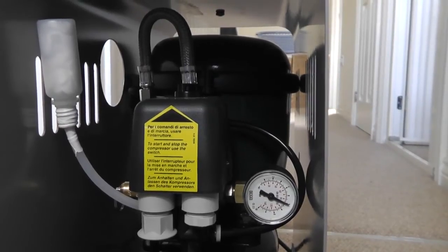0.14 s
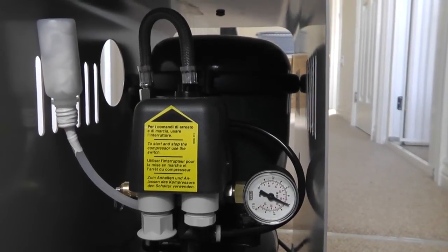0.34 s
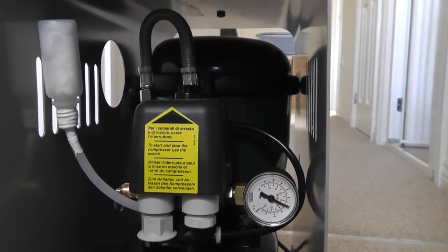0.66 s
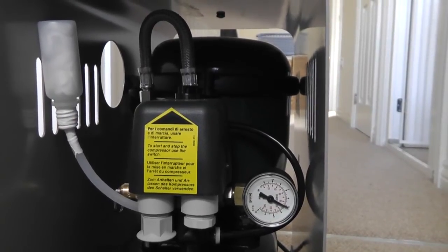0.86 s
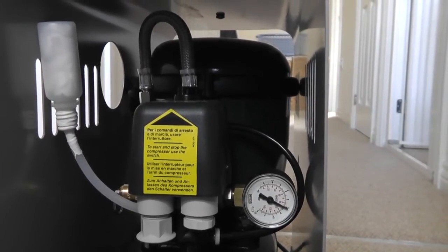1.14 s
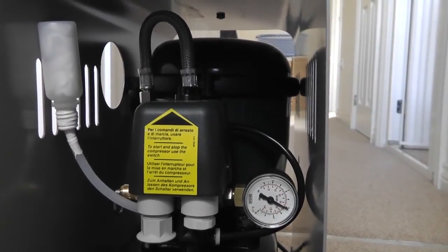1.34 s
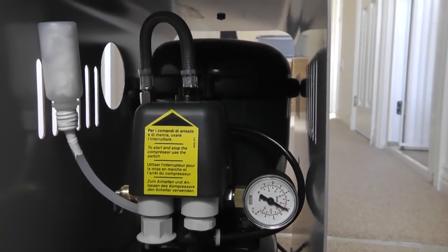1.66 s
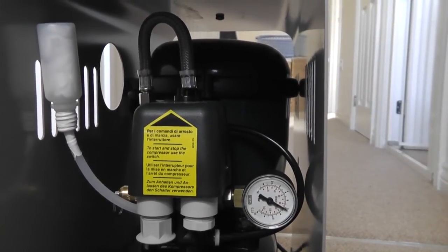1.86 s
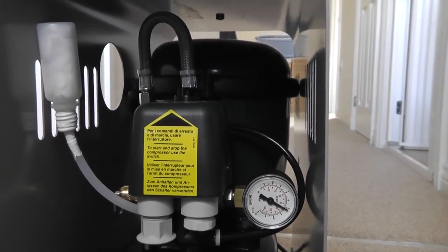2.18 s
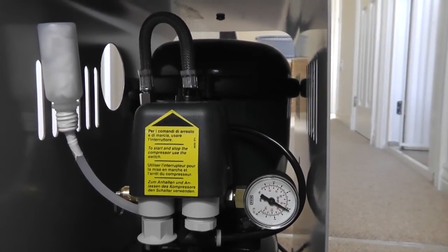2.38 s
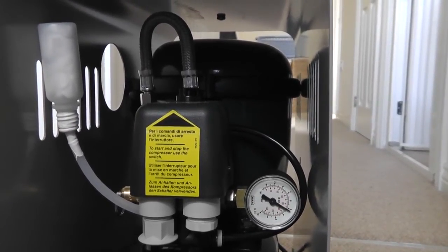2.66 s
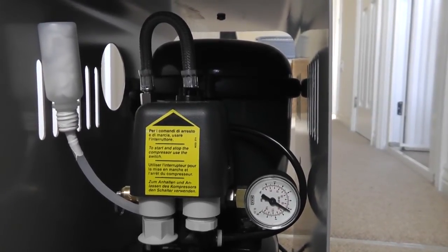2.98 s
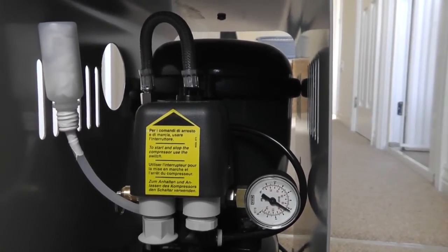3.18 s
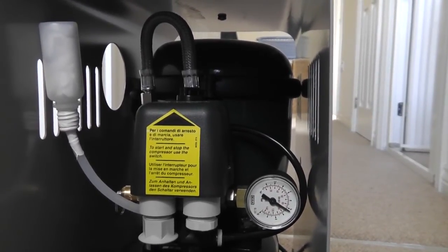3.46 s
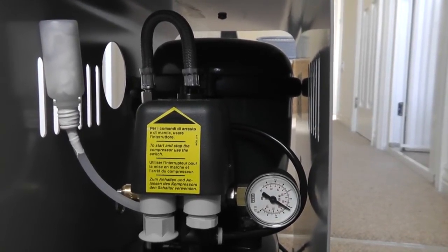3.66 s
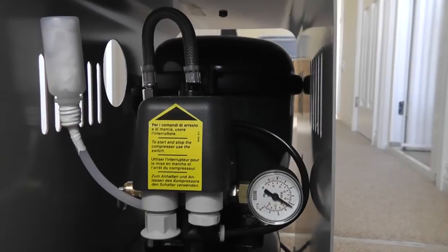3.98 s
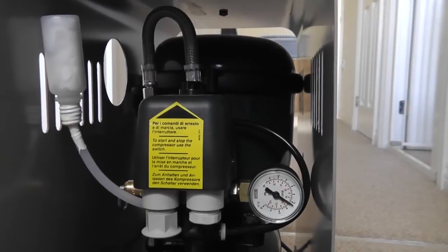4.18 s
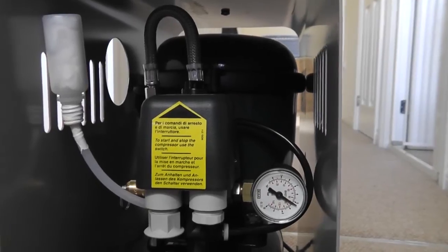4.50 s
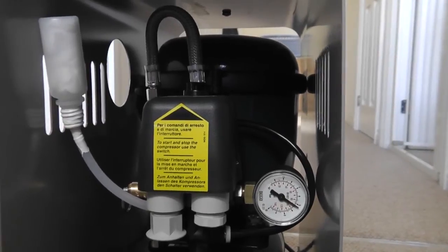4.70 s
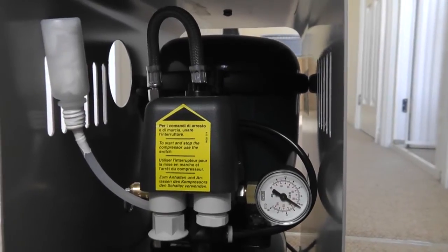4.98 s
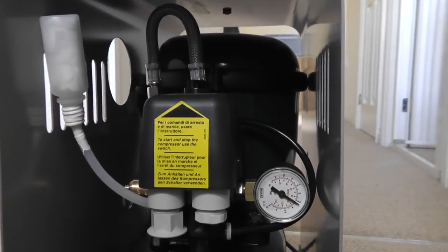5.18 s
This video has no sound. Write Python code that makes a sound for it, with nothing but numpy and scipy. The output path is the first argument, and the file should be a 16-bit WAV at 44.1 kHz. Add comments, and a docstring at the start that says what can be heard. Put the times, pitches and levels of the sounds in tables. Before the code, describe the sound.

A small compressor hums and buzzes steadily, then its switch snaps off loudly, a short burst of air vents, and soft glugs follow.

```python
"""A small sealed piston compressor hums in its cabinet over quiet room tone: repeating shaft tones, gas noise
and motor hum. Its shaft slips against the mains, so the bass beats slowly; later a faint low drone climbs.
Then the pressure switch snaps off (noise bursts and ringing metal), the motor stops and the unloader dumps
the pipe's air through a silencer as fading, coloured noise. A few soft gliding glugs follow as the pump
settles. A small workroom answers everything from the snap onward."""
import sys
import numpy as np
from scipy import signal
from scipy.fft import rfft, irfft, next_fast_len
from scipy.io import wavfile
from scipy.ndimage import map_coordinates

SR = 44100
rng = np.random.default_rng(int(sys.argv[2]) if len(sys.argv) > 2 else 0)


def store_pcm(level_fs):
    """Save levels as 16-bit WAV."""
    pcm = np.round(np.clip(level_fs, -1, 1) * 32767).astype(np.int16)
    wavfile.write(sys.argv[1], SR, np.atleast_2d(pcm).T)


N = 235398
T = np.arange(N) / SR  # time of each sample, s
SHAFT_HZ, MAINS_HZ = 49.136, 49.94
CUT_OUT_S = 4.5645  # when the switch snaps off
TOP_HZ = 15800  # nothing is kept above this


def amp(db):
    """Turn decibels into a gain."""
    return 10 ** (np.asarray(db) / 20)


def unit(x):
    """Scale to an average (rms) level of 1."""
    return x / np.sqrt(np.mean(x ** 2) + 1e-20)


def since(start):
    """Seconds gone by since start, zero before it."""
    return np.maximum(T - start, 0)


def ramp(start, length):
    """A straight rise from 0 to 1."""
    return np.clip((T - start) / length, 0, 1)


def wobble(rate):
    """A smooth random curve with rate new random points a second."""
    points = rng.standard_normal(int(N * rate / SR) + 4)
    return map_coordinates(points, [T * rate], mode="nearest")


def along(points, hz):
    """Read each value column of a (f/Hz, ..) table at hz, on a log axis."""
    f, *columns = np.transpose(points)
    return [np.interp(np.log(hz + 1), np.log(f + 1), c) for c in columns]


def filtered(x, response):
    """Change each frequency of x by the gain that response gives for it."""
    size = next_fast_len(N + SR // 2)
    spectrum = rfft(x, size) * response(np.fft.rfftfreq(size, 1 / SR))
    return irfft(spectrum, size)[..., :N]


def colour(points):
    """A smooth tone colour drawn through (f/Hz, level/dB) points."""
    return lambda f: amp(along(points, f)[0])


def resonances(modes):
    """A body that favours its own notes, given as (f/Hz, width/Hz, level/dB)."""
    def response(f):
        total = 0
        for k, (centre, width, db) in enumerate(modes):
            peak = 1j * f * width / (centre * centre - f * f + 1j * f * width)
            total = total + (-1) ** k * amp(db) * peak  # neighbours have opposite signs
        return total
    return response


# how alike left and right are: (f/Hz, likeness from 0 to 1)
ALIKE = [(60, 0.15), (300, 0.37), (1400, 0.6), (2700, 0.93), (3800, 0.91), (6800, 1), (9500, 0.69),
         (15000, 0.27)]


def noise():
    """White stereo noise: a shared middle plus a side part of opposite sign in each ear."""
    def middle_and_side(f):
        turn = np.arccos(np.clip(along(ALIKE, f)[0], -1, 1)) / 2
        return np.array([np.cos(turn), np.sin(turn)])
    mid, side = filtered(rng.standard_normal((2, N)), middle_and_side)
    return np.array([mid + side, mid - side])


def out_of_step(hz):
    """Cabinet reflections give a tone opposite phase offsets at left and right."""
    spread = np.sqrt(np.abs(1 - along(ALIKE, hz)[0]))
    return np.array([[1], [-1]]) * spread * rng.standard_normal(np.shape(hz))


# colour of the quiet room: (f/Hz, relative level/dB)
ROOM_TONE = [(20, -19), (45, -10), (80, 4.5), (150, -1), (300, -6.5), (800, -11), (2000, -26), (5000, -23),
             (15500, -21.5)]


def room_tone(db):
    """Steady coloured noise under everything."""
    return amp(db) * unit(filtered(noise(), colour(ROOM_TONE)))


# strong low tones of the shaft: (multiple of the shaft speed, left level/dB, right level/dB)
LOW_ORDERS = [(1, -65.0, -69.0), (2, -59.0, -59.0), (3, -83.0, -78.0), (4, -80.0, -77.0), (5, -77.0, -70.0),
              (6, -57.0, -56.0), (7, -52.0, -53.0), (8, -48.0, -52.0), (9, -64.0, -73.0),
              (10, -56.0, -54.0), (11, -61.0, -64.0), (12, -59.0, -56.0), (13, -49.0, -46.0),
              (14, -53.0, -49.0), (15, -54.0, -52.0), (16, -54.0, -61.0)]
# the buzz above them, before the ridges shape it: (f/Hz, level/dB of each multiple)
BUZZ = [(830, -69), (980, -72.5), (1040, -59.5), (1400, -66), (1800, -73), (2450, -78.5), (2850, -67),
        (3350, -66), (3500, -79.5), (4700, -91), (5700, -91.5), (6300, -80.5), (8800, -85.5), (9500, -92),
        (15000, -104)]
# narrow shell resonances that raise or lower the buzz tones under them: (f/Hz, width/Hz, change/dB)
RIDGES = [(1458, 29, 6), (1696, 26, 12), (1981, 26, 15), (2550, 16, 9.5), (2852, 68, 7), (3770, 36, 11.5),
          (5294, 61, 14.5), (6320, 87, 8), (7150, 120, 3.5), (8030, 200, -8), (8260, 48, 7),
          (11050, 60, 12.5)]
# when in the turn each pitch leaves the shell: (f/Hz, arrival/turns, scatter/turns)
ARRIVAL = [(100, 0.407, 0.096), (262, 0.36, 0.044), (393, 0.55, 0.016), (447, 0.38, 0.071),
           (547, 0.908, 0.042), (600, 0.774, 0.041), (710, 0.72, 0), (771, 0.493, 0.09), (980, 0.844, 0.23),
           (1591, .65, 0.28), (3013, .46, 0.163), (7020, .58, 0.29)]


def piston(turns, uneven_db, apart):
    """The shell repeats one pattern each turn, built from multiples of the shaft speed."""
    order = np.arange(1, int(TOP_HZ / SHAFT_HZ))
    hz = order * SHAFT_HZ
    lift = sum(db * np.exp(-((hz - centre) / width) ** 2) for centre, width, db in RIDGES)
    buzz = along(BUZZ, hz)[0] + lift + uneven_db * rng.standard_normal(len(order))
    level = buzz + np.zeros((2, 1))  # same for both ears
    level[:, :len(LOW_ORDERS)] = np.transpose(LOW_ORDERS)[1:]
    arrival, scatter = along(ARRIVAL, hz)
    # adding up the arrivals makes each pitch band peak at its own place in the turn
    phase = -2 * np.pi * np.cumsum(arrival + scatter * rng.standard_normal(len(order)))
    skew = apart * out_of_step(hz) * (order > len(LOW_ORDERS))
    lines = np.sqrt(2) * amp(level) * np.exp(1j * (phase + skew))
    size = 8192  # points in one turn
    cycle = irfft(np.pad(lines, ((0, 0), (1, 0))), size) * size / 2
    return np.array([np.interp(turns, np.arange(size) / size, c, period=1) for c in cycle])


# magnetic hum of the motor: (multiple of the mains, level/dB)
MAINS = [(2, -61), (10, -61), (12, -66)]


def mains_hum():
    """The motor's magnetism hums at multiples of the mains frequency."""
    return sum(np.sqrt(2) * amp(db) * np.cos(2 * np.pi * k * MAINS_HZ * T) for k, db in MAINS)


def gated(turns, body, db, depth_db, open_at, uneven_db):
    """Gas noise swells and sinks once a turn, a little different each time, and rings a body."""
    stroke_db = depth_db * np.cos(2 * np.pi * (turns - open_at)) + uneven_db * wobble(SHAFT_HZ)
    return amp(db) * unit(filtered(noise() * amp(stroke_db), resonances(body)))


# shell resonances stirred by gas through the valves: (f/Hz, width/Hz, relative level/dB)
SHELL = [(720, 230, -6), (1027, 96, -5), (1320, 200, -9.5), (1657, 21, 2.5), (1993, 57, -3),
         (2754, 100, -5), (3060, 44, -4.5), (3253, 130, -1), (6950, 380, -27)]
# resonances rung by the valve reeds: (f/Hz, width/Hz, relative level/dB)
REEDS = [(2200, 177, 1.5), (3312, 32, 2), (5250, 39, -13.5), (6016, 80, 1), (8320, 130, -11)]


def pump():
    """Piston, valves and mains hum, all dying quickly once the power is cut."""
    turns = SHAFT_HZ * T + 0.00048 * wobble(4.08) + 0.0002 * wobble(45)  # slightly unsteady shaft
    valves = gated(turns, SHELL, db=-56.0, depth_db=-0.5, open_at=0.54, uneven_db=-0.5)
    reeds = gated(turns, REEDS, db=-58.5, depth_db=8.5, open_at=0.4, uneven_db=1.0)
    load = amp(0.12 * (T - CUT_OUT_S / 2))  # a little louder as the tank fills
    running = amp(-60 * since(CUT_OUT_S) / 0.43)  # falls 60 dB in 0.43 s
    # the shaft lags the mains a little, so their shared multiples beat
    return running * (load * piston(turns, uneven_db=2.0, apart=0.91) + valves + reeds + mains_hum())


DRONE_REST_HZ, DRONE_TOP_HZ = 29.6, 47.3
CLIMB_AT_S, CLIMB_S = 3.25, 1.3
DRONE_DB, DRONE_DB_PER_OCTAVE, DRONE_FADE_DB_PER_S = -80.5, 21, 14


def drone(octave_db):
    """A faint low tone and its octave rest, climb once while swelling, then fade."""
    hz = DRONE_REST_HZ + (DRONE_TOP_HZ - DRONE_REST_HZ) * ramp(CLIMB_AT_S, CLIMB_S)
    swell_db = DRONE_DB_PER_OCTAVE * np.log2(hz / DRONE_REST_HZ)
    fade_db = DRONE_FADE_DB_PER_S * since(CLIMB_AT_S + CLIMB_S)
    phase = 2 * np.pi * np.cumsum(hz) / SR
    tones = np.sin(phase) + amp(octave_db) * np.sin(2 * phase)
    return np.sqrt(2) * amp(DRONE_DB + swell_db - fade_db) * tones


# colour of the switch's clatter: (f/Hz, relative level/dB per Hz)
SNAP = [(24, -37), (40, -8.5), (548, 0), (859, -11.5), (1560, 4.5), (1860, -5.5), (2840, -3), (3060, -13.5),
        (3650, -5), (5300, -13), (7910, -6), (13000, -37), (15500, -35)]
# sheet-metal notes of the tank and cabinet: (f/Hz, relative level/dB, t60/s = time to fall 60 dB)
CABINET = [(1181, -9, .45), (1207, -9, .35), (1443, -8, .5), (1570, -6, .3), (1630, 0, .45), (1675, -6, .5),
           (2050, -11, .4), (2290, -8, .45), (2519, -7, .3), (2548, -7, .35), (2760, -9, .3),
           (3460, -12, .35), (4540, -14, .25), (7833, -10, .25)]


def switch(crack_db, crack_t60, clatter_db, clatter_t60, ring_db):
    """The spring throws the contacts open: a bright crack, a clatter in the cover, ringing sheet metal."""
    t = since(CUT_OUT_S)
    bright = colour([(1000, -14), (7000, 1.5), (15000, 0.5)])
    crack = amp(crack_db - 60 * t / crack_t60) * unit(filtered(noise(), bright))
    clatter = amp(clatter_db - 60 * t / clatter_t60) * unit(filtered(noise(), colour(SNAP)))
    ring = np.zeros((2, N))
    for hz, db, t60 in CABINET:
        phase = rng.uniform(0, 2 * np.pi) + out_of_step(hz) + 0.5 * wobble(40)
        ring += amp(db - 60 * t / t60) * np.sin(2 * np.pi * hz * t + phase)
    crack_onset = 1 - np.exp(-t / 0.0006)
    slower_onset = 1 - np.exp(-t / 0.0021)
    return crack * crack_onset + (clatter + amp(ring_db) * ring) * slower_onset


# the hiss falls steadily with the pipe's pressure, then faster once the pipe is nearly empty
HISS_DB, HISS_FALL_DB_PER_S = -26, 53.5
EMPTY_AFTER_S, EMPTY_FALL_DB_PER_S = 0.31, 108
# the silencer's body fades more slowly, with one quick extra drop on the way
BODY_DB, BODY_FALL_DB_PER_S = -25.5, 43
DROP_AFTER_S, DROP_LENGTH_S, DROP_DB = 0.2, 0.022, 5.5


def blowdown():
    """Levels in dB of the hiss and of the silencer's body as the pipe loses its pressure."""
    t = since(CUT_OUT_S)
    steady_fall = HISS_FALL_DB_PER_S * np.minimum(t, EMPTY_AFTER_S)
    late_fall = EMPTY_FALL_DB_PER_S * since(CUT_OUT_S + EMPTY_AFTER_S)
    drop = DROP_DB * ramp(CUT_OUT_S + DROP_AFTER_S, DROP_LENGTH_S)
    return HISS_DB - steady_fall - late_fall, BODY_DB - BODY_FALL_DB_PER_S * t - drop


def standing_waves(spacing_hz, depth_db):
    """The silencer tube favours evenly spaced bands of the hiss."""
    return lambda f: amp(-depth_db * np.cos(2 * np.pi * f / spacing_hz))


# colour of the escaping air: (f/Hz, relative level/dB per Hz)
HISS = [(700, -24), (1250, -9), (1700, -9), (1830, -12), (2200, -5), (2750, -4), (3080, -7), (3500, -5),
        (4450, -15), (7200, -8.5), (10000, -13), (12300, -11), (15500, -15.5)]
# silencer resonances: (f/Hz, width/Hz, relative level/dB)
SILENCER = [(84, 32, -10.5), (209, 37, -3), (423, 164, -3), (687, 120, -1.5), (842, 83, -2.5), (966, 50, 2),
            (1190, 115, -4), (1490, 77, -11), (1640, 49, -8.5)]
# the silencer's balance between the ears: (f/Hz, left minus right level/dB)
LEAN = [(60, -4), (200, -4), (380, 1), (700, -1), (1300, 0.5), (2400, 5)]
# resonances of the emptied pipe: (f/Hz, width/Hz, relative level/dB)
PIPE = [(170, 140, -9.5), (490, 87, -0.5), (850, 60, 2.5), (1430, 130, -7), (2110, 250, -11),
        (3630, 720, -20)]


def vent(sputter_db, trickle_db):
    """Trapped air hisses and sputters out through the silencer, fading until a faint trickle is left."""
    hiss_db, body_db = blowdown()
    air = filtered(filtered(noise(), colour(HISS)), standing_waves(spacing_hz=1492, depth_db=1.5))
    hiss = amp(hiss_db + 1.0 * wobble(60)) * unit(air)
    body = amp(body_db + sputter_db * wobble(80)) * unit(filtered(noise(), resonances(SILENCER)))
    body = filtered(body, lambda f: amp(np.array([[0.5], [-0.5]]) * along(LEAN, f)[0]))
    trickle = amp(trickle_db + sputter_db * wobble(35)) * unit(filtered(noise(), resonances(PIPE)))
    return (hiss + body + trickle) * ramp(CUT_OUT_S, 0.003)  # the unloader opens in 3 ms


# how long the workroom rings: (f/Hz, t60/s)
ROOM = [(150, 0.47), (500, 0.55), (2000, 0.34), (12000, 0.14)]


def room(x):
    """The workroom's echo: x smeared by fading noise whose treble dies first."""
    hz, t, grains = signal.stft(rng.standard_normal((2, SR // 2)), SR, nperseg=256)
    fade = amp(-60 * t / along(ROOM, hz)[0][:, None])
    tail = signal.istft(grains * fade, SR, nperseg=256)[1]
    return signal.fftconvolve(x, tail / np.linalg.norm(tail[0]), axes=1)[:, :N]


# glugs: (t/s, level/dB before the left and right gains, length/s, start f/Hz, end f/Hz)
GLUGS = [(4.689, -30, 0.024, 757, 725), (4.713, -29.5, 0.025, 664, 637), (4.762, -35, 0.016, 433, 414),
         (4.918, -45, 0.025, 500, 483), (5.0, -43.5, 0.015, 495, 493), (5.038, -41.5, 0.022, 370, 570),
         (5.096, -49, 0.016, 460, 460), (5.142, -40.5, 0.032, 310, 563), (5.233, -53, 0.037, 472, 490),
         (5.294, -42, 0.04, 382, 508)]


def glugs(glide_s, fade_db):
    """Pockets of gas slip through the oily pipe; each note glides from its start to its end pitch."""
    out = np.zeros(N)
    for start, db, length, start_hz, end_hz in GLUGS:
        t = since(start)
        hz = end_hz + (start_hz - end_hz) * np.exp(-t / glide_s)
        onset = 1 - np.exp(-t / 0.0025)
        ending = np.exp(-(t / (1.64 * length)) ** 6)
        swell = onset * amp(db - fade_db * t / length) * ending
        out += np.sqrt(2) * swell * np.sin(2 * np.pi * np.cumsum(hz * (t > 0)) / SR)
    return out * amp([[2.5], [1.2]])  # left and right gains, dB


def scene():
    """The running pump, then the cut-out, over quiet room tone."""
    running = pump() + drone(octave_db=-1)
    snap = switch(crack_db=-8.5, crack_t60=0.026, clatter_db=-17.0, clatter_t60=0.27, ring_db=-26.0)
    air = vent(sputter_db=1.5, trickle_db=-54.5)
    cut_out = snap + air + glugs(glide_s=0.0115, fade_db=10.0)
    return room_tone(db=-60.0) + running + cut_out + amp(-17.0) * room(cut_out)


def record(dry):
    """Keep nothing above the band limit."""
    return filtered(dry, lambda hz: hz < TOP_HZ)


dry = scene()
out = record(dry)
store_pcm(out)
```